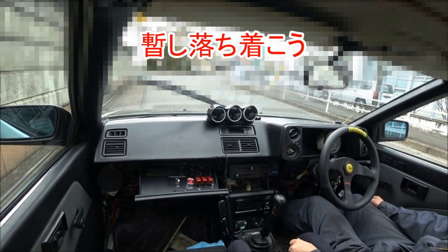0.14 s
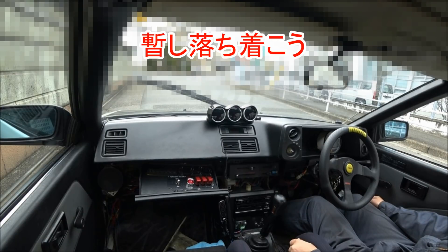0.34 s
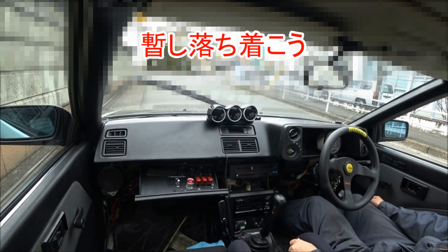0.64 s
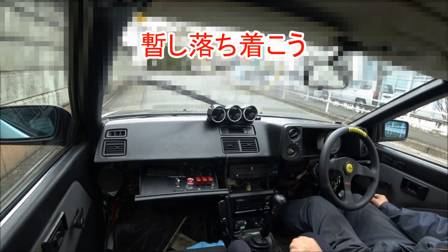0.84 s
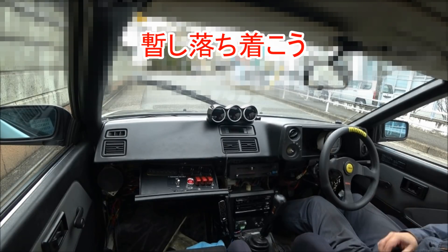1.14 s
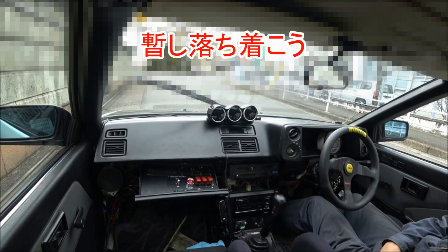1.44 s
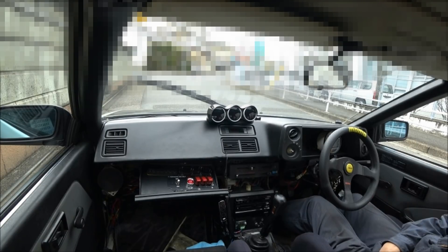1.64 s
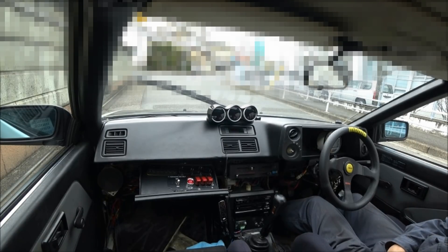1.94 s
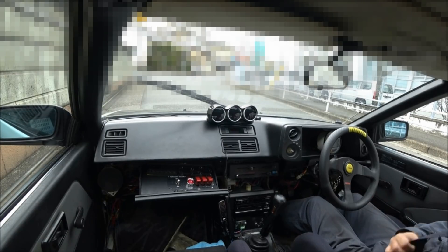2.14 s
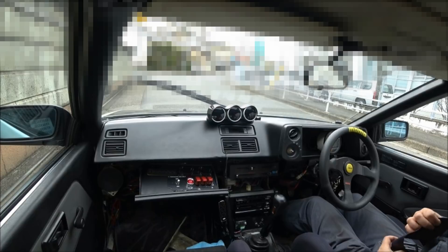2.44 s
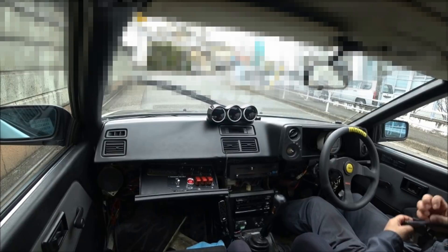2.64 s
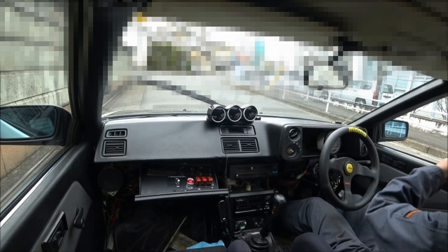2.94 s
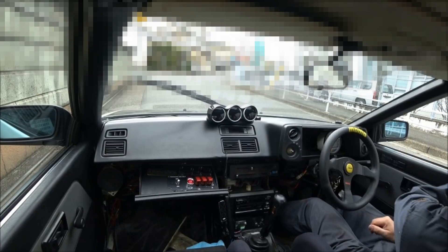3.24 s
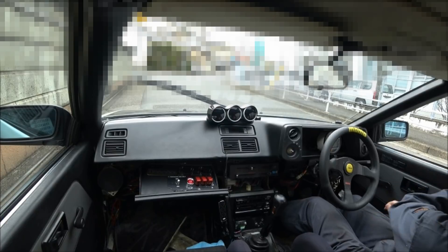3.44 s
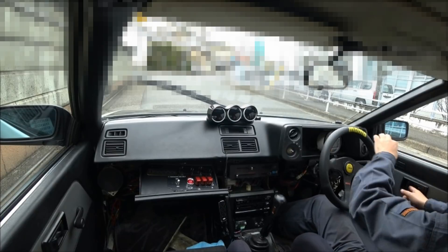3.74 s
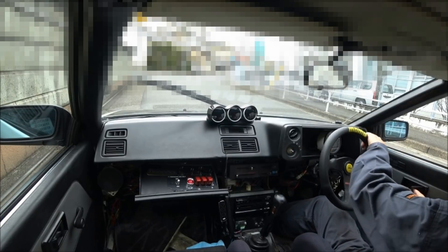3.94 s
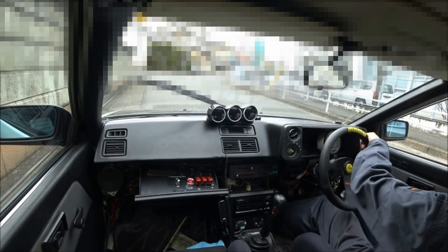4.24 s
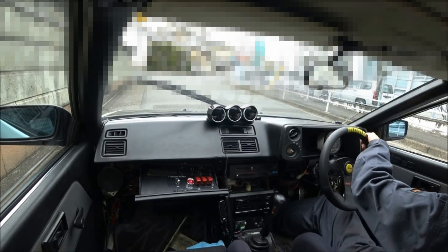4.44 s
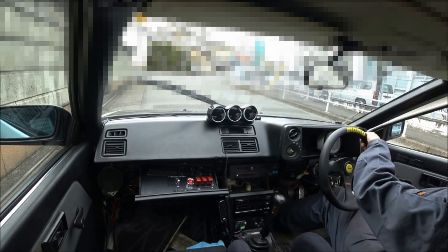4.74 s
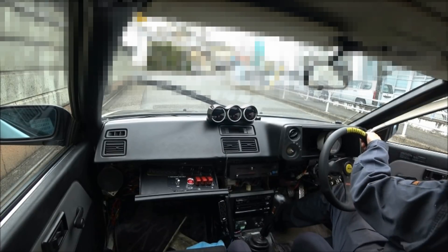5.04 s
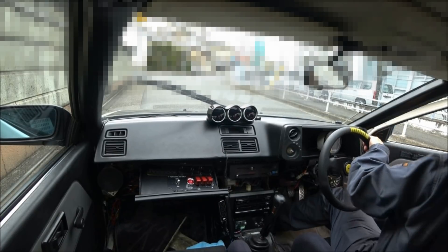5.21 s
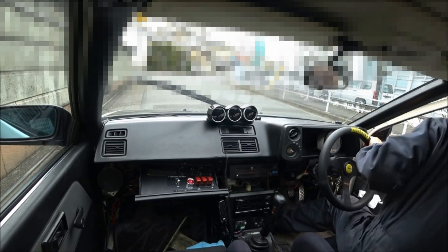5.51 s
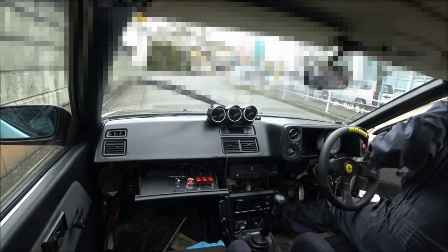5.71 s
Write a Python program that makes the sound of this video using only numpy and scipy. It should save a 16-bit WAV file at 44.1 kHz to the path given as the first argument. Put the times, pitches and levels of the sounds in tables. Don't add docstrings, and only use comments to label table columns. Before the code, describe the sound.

Inside a parked car, a driver unclips the belt, rustles and creaks across the seat, then opens the door with thumps and low rumble.

```python
import sys
import numpy as np
from scipy import signal
from scipy.fft import rfft, irfft, next_fast_len
from scipy.io import wavfile
from scipy.ndimage import uniform_filter1d

SR = 44100
rng = np.random.default_rng(int(sys.argv[2]) if len(sys.argv) > 2 else 0)


def amplitude_ratio(level_db):
    exponent = np.asarray(level_db, float) / 20
    return 10 ** exponent


def transcribe(u):
    v = np.clip(np.atleast_2d(u).T, -1, 1)
    q = np.round(v * 32767).astype(np.int16)
    wavfile.write(sys.argv[1], SR, q)


N = 258867


def evened(x):
    return x / np.sqrt(np.mean(x ** 2) + 1e-20)


def read(points, hz):
    f, value = np.transpose(points)
    return np.interp(np.log(hz + 1), np.log(f + 1), value)


def pair(count):
    return rng.standard_normal((2, count))


# (frequency [Hz], left-right likeness [0-1])
NEAR = [(25, 0.95), (60, 1), (160, 0.98), (500, 0.87), (1500, 0.92), (4000, 0.29), (11000, 0.05)]
# (frequency [Hz], level [dB])
LEAN = [(300, 0), (600, -1.7), (1200, 0.75), (4000, -2), (8000, -0.9)]
LAG_S = 0.00008


def heard(x, same, shape=((1, 0), (20000, 0))):
    count = x.shape[1]
    size = next_fast_len(count)
    hz = np.fft.rfftfreq(size, 1 / SR)
    right, other = rfft(x, size) * amplitude_ratio(read(shape, hz))
    c = np.clip(read(same, hz), 0, 1)
    left = c * right + np.sqrt(1 - c ** 2) * other
    left = left * np.exp(-2j * np.pi * hz * LAG_S) * amplitude_ratio(read(LEAN, hz))
    return irfft(np.array([left, right]), size)[:, :count]


def move(table, count, steep=1):
    rows = np.array(table)[:, :, None]
    t = np.arange(0, N + 64, 64) / SR
    peak_s, rise_s, fall_s = rows[:, 0], rows[:, 1], rows[:, 2]
    away = np.maximum((peak_s - t) / rise_s, (t - peak_s) / fall_s)
    gain = np.linalg.norm(amplitude_ratio(rows[:, count] - 10 * steep * away), axis=0)
    return np.interp(np.arange(N) / SR, t, gain)


def resonate(x, hz, width_hz):
    r = np.exp(-np.pi * width_hz / SR)
    return 2 * signal.lfilter([1 - r], [1, -r * np.exp(2j * np.pi * hz / SR)], x).real


def flicker(per_s, spread_db, t60_s):
    size = amplitude_ratio(spread_db * np.minimum(rng.exponential(1, N), 4))
    slips = (rng.random(N) < per_s / SR) * size
    fall = np.exp(-np.log(1000) / (t60_s * SR))
    return evened(1 + signal.lfilter([1], [1, -fall], slips))


# (frequency [Hz], left-right likeness [0-1])
STILL = [(60, 0.7), (220, 0.98), (810, 0.28), (2980, 0.039), (11000, 0.01)]
# (frequency [Hz], level [dB])
HUSH = [(88, -6.5), (150, -2.5), (293, -15), (563, -21.5), (780, -15.5), (839, -19.5), (3150, -27.5),
        (10400, -30), (11400, -30), (14800, -72), (22000, -120)]


def still_cabin():
    return amplitude_ratio(-46.5) * evened(heard(pair(N), STILL, HUSH))


# (peak [s], rise [s], fall [s], rumble [dB])
BOOM = [(.2, 0.37, 1, -32), (.46, 0.035, 0.97, -28.5), (.9, 0.052, 0.14, -31), (1.4, 0.14, 0.11, -27),
        (1.54, 0.15, 1, -30.5), (2.2, 0.33, 0.6, -34.5), (2.75, 0.16, 0.51, -32), (3.2, 1, 0.36, -28.5),
        (3.53, 0.1, 0.089, -24.5), (3.74, 0.033, 0.29, -22), (4.01, 0.059, 0.18, -21),
        (4.2, 0.026, 0.093, -17.5), (4.36, 0.089, 0.26, -22), (4.62, 0.24, 0.069, -21),
        (4.76, 0.019, 0.082, -25), (4.9, 0.091, 0.19, -25), (5.13, 0.26, 0.14, -24),
        (5.33, 0.0985, 0.052, -18.5), (5.59, 0.22, 0.46, -18), (5.87, 0.28, 0.18, -24)]
# (frequency [Hz], density [dB per Hz])
RUMBLE = [(7.1, -5), (12, -19.5), (32, 2), (60, -3.5), (81, -7.5), (100, -4.5), (114, -16), (200, -68),
          (260, -72), (440, -120)]
# (frequency [Hz], width [Hz], level [dB])
CABIN = [(29.7, 17, -2.5), (63.7, 4.7, -5), (160, 15.6, -4.5), (214.8, 46, 0), (419, 16, -4.5),
         (601, 116, -3), (694, 12, 5), (865, 12, -6)]


def shell():
    air = evened(heard(pair(N), NEAR, RUMBLE))
    boom = air + 2.05 * sum(amplitude_ratio(db) * resonate(air, hz, width) for hz, width, db in CABIN[:2])
    power = (boom ** 2).mean(0)
    swing = np.sqrt(uniform_filter1d(uniform_filter1d(power, 2500), 1200)) + 0.1
    return move(BOOM, count=3) * evened(boom / swing ** 0.65)


# (peak [s], rise [s], fall [s], seat groan [dB], frame creak [dB])
MOVES = [(0, .3, 0.16, -43, -46.5), (.3, 0.15, 0.87, -48, -64), (1.04, 0.29, 1, -39, -67),
         (1.3, 0.91, 0.34, -57, -42), (1.55, 0.31, 0.62, -44.5, -44.5), (2.19, 0.35, 0.096, -37, -41.5),
         (2.73, 0.99, 0.075, -37.5, -44), (2.96, 0.19, 0.18, -31, -36), (3.1, 0.031, 0.15, -24.5, -26.5),
         (3.33, 0.37, 0.27, -34, -37.5), (3.78, 0.043, 0.07, -29.5, -35.5), (4.02, 0.11, 0.83, -28, -34),
         (4.4, 0.078, 0.5, -27, -43), (5.02, 0.31, 0.39, -27, -35.5), (5.45, 0.6, 0.15, -30.5, -37),
         (5.87, 0.11, 0.066, -25.5, -35)]
# (frequency [Hz], density [dB per Hz])
GROAN = [(59, -8), (100, 1), (178, -2), (226, -3.5), (340, -9.5), (440, -40), (750, -120)]
# (frequency [Hz], density [dB per Hz])
CREAK = [(190, -14), (320, 1), (416, -1.5), (506, -5), (850, -22.5), (1100, -11), (1870, -120)]


def seat():
    lumps = flicker(per_s=60, spread_db=0.33, t60_s=0.059)
    slips = move(MOVES, count=3) * evened(heard(pair(N) * lumps, NEAR, GROAN))
    slips += move(MOVES, count=4) * evened(heard(pair(N) * lumps, NEAR, CREAK))
    cabin = sum(amplitude_ratio(db) * resonate(slips, hz, width) for hz, width, db in CABIN[2:])
    return 0.67 * slips + 0.97 * cabin


def patchy(x, patchy_db):
    z = signal.stft(x, nperseg=512)[2]
    field = rng.standard_normal(z.shape[::-1][:2])
    field = uniform_filter1d(uniform_filter1d(field, 12, 0), 5, 1)
    return signal.istft(z * amplitude_ratio(patchy_db * evened(field).T), nperseg=512)[1][:, :N]


# (peak [s], rise [s], fall [s], nylon sizzle [dB], cloth rub
# [dB])
STROKES = [(1.083, 0.2, 0.052, -34, -40.5), (1.18, 0.0093, 0.048, -46, -42),
           (1.271, 0.014, 0.36, -42, -43), (1.39, 0.16, 0.15, -40.5, -41), (1.52, 0.02, 0.046, -36.5, -38),
           (1.6, 0.035, 0.77, -51.5, -64), (1.7, 0.048, 0.019, -46, -41.5),
           (1.781, 0.0072, 0.0072, -53, -66), (1.93, 0.13, 0.12, -43.5, -42),
           (2.05, 0.083, 0.39, -40.5, -39), (2.194, 0.061, 0.12, -34, -35),
           (2.45, 0.072, 0.24, -42.5, -58), (2.65, 0.26, 0.058, -39, -39), (2.732, 0.043, 0.12, -33, -76),
           (2.86, 0.03, 0.94, -43, -40.5), (3.05, 0.25, 0.077, -56, -62),
           (3.179, 0.095, 0.026, -34.5, -35), (3.3, 0.12, 0.13, -43, -47), (3.47, 0.12, 0.077, -47, -45),
           (3.75, 0.52, 0.18, -50.5, -48.5), (3.93, 0.012, 0.11, -48.5, -56),
         (3.972, 0.013, 0.022, -44, -27.5), (4.255, 0.015, .015, -47, -51),
         (4.064, 0.0089, 0.019, -62, -31.5), (4.105, 0.016, 0.022, -59, -40),
         (4.16, 0.031, 0.018, -59, -42), (4.21, 0.011, 0.077, -53, -39.5), (4.396, 0.07, 0.049, -37.5, -49),
         (4.528, 0.056, 0.0088, -44.5, -39), (4.7, 0.32, 0.082, -47, -48.5),
         (4.92, 0.19, 0.037, -41.5, -36.5), (5.07, 0.23, 0.11, -39, -34.5), (5.28, 0.094, 0.055, -44, -40),
         (5.454, 0.31, 0.14, -40.5, -37.5), (5.81, 0.13, 0.11, -37.5, -38.5)]
# (frequency [Hz], density [dB per Hz])
RUB = [(460, -35), (780, -4), (1590, -2.5), (1720, -6), (2070, -4.5), (3200, -9.5), (4160, -18.5),
       (7040, -120)]
# (frequency [Hz], density [dB per Hz])
SIZZLE = [(1470, -5), (2500, -0.5), (4450, 1), (4810, -0.5), (6120, 1.5), (9980, 1), (11000, -1.5),
          (11400, -57), (14800, -52), (22000, -120)]


def jacket():
    stir_s, stir_rise_s = 0.828, 0.063
    drag = flicker(per_s=70, spread_db=0.27, t60_s=0.012)
    strokes = STROKES
    rub = evened(patchy(heard(pair(N) * drag, NEAR, RUB), patchy_db=1.5))
    sizzle = evened(patchy(heard(pair(N) * drag ** 0.54, NEAR, SIZZLE), patchy_db=2.0))
    rub = amplitude_ratio(-3.0) * move(strokes, count=4, steep=0.86) * rub
    sizzle = amplitude_ratio(2.0) * move(strokes, count=3) * sizzle
    moving = np.clip((np.arange(N) / SR - stir_s) / stir_rise_s, 0, 1)
    return moving * (rub + sizzle)


FADE = np.cos(np.linspace(0, np.pi / 2, 6144)) ** 0.5


def played(table, strike):
    out = np.zeros((2, N))
    for s, *row in table:
        sound = strike(*row)
        part = out[:, round(s * SR):][:, :sound.shape[1]]
        part += sound[:, :part.shape[1]]
    return out


def burst(t60_s, rise_s, contact):
    t = np.arange(len(FADE)) / SR
    rise_s = max(rise_s, 0.0002)
    shape = amplitude_ratio(-60 * t / max(t60_s, 0.006)) * (1 - np.exp(-t / rise_s))
    noise = pair(len(t)) * shape / shape.max()
    noise[:, round(rise_s * SR)] += contact
    return noise


def click(db, hz, t60_s, width_hz, rise_s):
    bright = [(250, -21), (700, 4.0), (4000, 16.0), (11000, 14.5)]
    snap = heard(burst(t60_s, rise_s, contact=2.3), NEAR, bright)
    tone = resonate(resonate(snap, hz, width_hz), hz, width_hz) * FADE
    return amplitude_ratio(db) * tone / abs(tone).max()


# (time [s], peak [dB], t60 [s])
CLACKS = [(0.869, -39.5, 0.065), (1.141, -35, 0.15), (1.18, -40, .04), (1.518, -28.5, 0.098),
          (1.9289, -21.5, 0.051), (2.846, -30, 0.058), (3.1776, -20.5, 0.02), (3.719, -31.5, 0.046),
          (3.973, -23.5, 0.087), (4.178, -36, 0.078), (4.214, -38, 0.055), (4.256, -35, 0.07),
          (4.4021, -27, 0.089), (5.059, -21, 0.081)]


def clacks():
    return played(CLACKS, lambda db, t60_s: click(db, 1100, t60_s, width_hz=750, rise_s=0.00026))


def knock(db, hz, t60_s):
    soft = [(hz / 4, -24), (hz / 4.8, -1.5), (hz * 1.51, -1.5), (hz * 2.94, -30), (hz * 6, -70)]
    rise_s = 0.74 / hz
    blow = heard(burst(t60_s, rise_s, contact=15.4), NEAR, soft)
    part = resonate(blow, hz, 0.12 * hz)
    cabin = sum(amplitude_ratio(d) * resonate(blow, f, width) for f, width, d in CABIN[2:])
    onset = np.minimum(np.arange(1, len(FADE) + 1) * hz / SR, 1)
    both = (evened(part) + 0.5 * evened(cabin) + 0.5 * evened(blow)) * FADE * onset
    return amplitude_ratio(db) * both / abs(both).max()


# (time [s], peak [dB], ring [Hz], t60 [s])
KNOCKS = [(0.87, -22, 160, 0.59), (0.888, -17.5, 86.5, 0.087), (1.388, -19.5, 96.5, 0.034),
          (1.515, -25, 157, 0.068), (2.23, -23, 157, 0.2),  (2.672, -15.5, 165.4, 0.063),
          (3.076, -17.5, 166, 0.08), (3.136, -14.5, 85.2, 0.15), (3.189, -17, 219, 0.087),
          (3.426, -16.5, 153, 0.17), (3.496, -19.5, 112, 0.19), (3.718, -20, 160, 0.11),
          (3.973, -15.5, 198, 0.064), (4.056, -11.5, 122, 0.034), (4.182, -38, 103, 0.078),
           (4.252, -15.5, 209, 0.035), (4.331, -29, 220, 0.29), (4.416, -22, 107, 0.079),
          (4.509, -20, 176, 0.058), (4.525, -20, 191, 0.04), (4.611, -25, 221, 0.077),
           (4.901, -37, 85, 0.052), (4.916, -16, 211, 0.077), (5.038, -13.5, 108, 0.16),
          (5.1, -19, 91, 0.048), (5.164, -30, 209, 0.05), (5.286, -17.5, 107, 0.088),
          (5.581, -18.5, 88, 0.022), (5.801, -16, 160, 0.23), (5.849, -16, 102, 0.018)]


def knocks():
    return played(KNOCKS, knock)


def ping(db, hz, t60_s):
    t = np.maximum(np.arange(len(FADE)) / SR - np.array([[LAG_S], [0]]), 0)
    rise_s = 0.29 / hz + 0.00023
    shape = amplitude_ratio(-60 * t / max(t60_s, 0.006)) * (1 - np.exp(-t / rise_s)) * FADE
    return amplitude_ratio(db) * shape / shape.max() * np.sin(2 * np.pi * hz * t)


# (time [s], peak [dB], mode [Hz], t60 [s])
PINGS = [(.871, -43, 2600, 0.015), (1.178, -30, 8060, 0.022), (1.9285, -26, 1050, 0.024),
         (1.929, -18.5, 4830, .03), (1.929, -31, 2200, 0.09), (1.929, -29, 6500, .02),
         (1.943, -28, 1060, 0.021), (1.946, -21, 9470, 0.021), (1.952, -21, 3130, 0.04),
         (1.951, -21, 3500, .035), (1.9515, -26, 6550, .03), (3.812, -26.5, 10630, 0.013),
         (4.215, -38, 5200, .02), (4.405, -20.5, 8130, 0.012), (1.178, -43, 3020, .015),
         (4.919, -25, 8100, .05), (2.821, -40, 1140, 0.053), (2.845, -24, 1200, 0.025),
         (2.85, -30, 1570, 0.035), (2.848, -33, 2400, 0.015), (2.905, -34, 950, 0.035),
         (3.139, -32, 1390, 0.11), (3.161, -29, 1485, 0.092), (3.17, -22, 879, 0.12),
         (3.173, -20, 627, 0.16), (3.184, -18, 713, .04), (3.718, -32.5, 627, .04),
         (3.796, -37, 3300, 0.015), (3.812, -19, 2740, 0.027), (3.8118, -25.5, 2250, .015),
         (3.812, -29.5, 738, 0.032), (3.811, -28, 3630, 0.035), (3.812, -26, 6282, 0.022),
         (3.968, -25, 1058, 0.12), (3.972, -17, 580, 0.05), (3.978, -24.5, 458, 0.23),
         (4.18, -34.5, 700, 0.027), (4.255, -22.5, 432, 0.047), (4.257, -30, 1030, 0.047),
         (4.405, -20.5, 1250, 0.034), (4.403, -29.5, 837, 0.049), (4.403, -28.5, 2725, 0.055),
         (4.42, -28.5, 604, .08), (5.291, -15.5, 1320, 0.012), (5.2914, -20, 1720, 0.011),
         (5.293, -24, 860, 0.022), (5.813, -40, 2200, 0.027)]


def pings():
    return played(PINGS, ping)


# (time [s], peak [dB], mode [Hz], t60 [s])
THUDS = [(.872, -20, 170, 0.027), (.892, -18.5, 79.6, 0.087), (2.66, -26.5, 303, 0.24),
         (2.914, -21.5, 302, 0.058), (3.105, -30, 642, 0.36), (3.125, -26, 399, 0.35),
         (3.19, -19.5, 233, 0.098), (3.21, -35, 805, 0.29), (3.428, -18, 419, 0.21),
         (3.432, -23.5, 705, 0.11), (3.436, -34, 860, 0.049), (3.445, -28, 308, 0.086),
         (3.995, -23, 227, 0.13), (4.056, -15, 69.6, 0.05), (4.211, -11, 62, 0.049),
         (4.512, -20, 194, 0.024), (4.524, -9, 196, 0.044), (4.659, -31, 264, 0.13),
         (4.958, -26, 108, 0.32), (5.164, -25, 223, 0.06), (5.578, -15.5, 100, 0.11),
         (5.51, -29, 342, 0.051), (1.522, -17, 110, 0.045), (1.567, -32, 310, 0.063),
         (1.628, -34, 430, 0.033), (1.637, -24, 192, 0.066), (1.678, -38, 420, 0.042),
         (2.847, -24.5, 333, .05), (5.805, -22, 149, 0.055), (5.702, -36, 278, 0.063),
         (5.835, -22, 243, 0.087)]


def thuds():
    return played(THUDS, ping)


# (time [s], peak [dB], mode [Hz], t60 [s])
MORE_PINGS = [(1.14, -38.5, 1490, 0.041), (1.194, -41, 2200, .015), (1.179, -35, 1160, .025),
              (1.179, -44, 9900, 0.018), (1.777, -43, 3040, .02), (1.381, -31, 2380, 0.026),
              (1.776, -47, 8000, 0.011), (1.93, -28, 10550, 0.014), (1.955, -23, 8100, .02),
              (1.96, -29, 4900, .04), (1.929, -26, 8600, .025), (2.037, -30.5, 400, .04), (2.044, -26, 150, .06),
              (2.345, -28, 285, 0.077), (2.379, -30, 575, .04), (2.75, -34, 570, 0.16), (3.562, -43, 600, .04),
              (4.216, -41, 1300, 0.012), (4.262, -23, 590, 0.022), (4.525, -32, 900, 0.048),
              (4.525, -38, 1530, 0.022), (4.755, -42, 1220, 0.039), (4.797, -35.5, 950, 0.043),
              (4.8, -34.5, 1340, 0.033), (4.9, -36, 1540, 0.046), (5.03, -33, 1340, .05), (5.035, -32, 954, .05),
              (5.06, -23, 1253, 0.026), (5.062, -29, 2420, .03), (5.11, -30.5, 558, 0.062),
              (5.17, -37.5, 1346, 0.09), (5.225, -35.5, 1270, .06), (5.248, -38, 2300, .02),
              (5.579, -34.5, 1010, 0.036), (2.854, -31, 1810, .03), (2.855, -32, 1250, 0.037),
              (5.814, -40, 4330, 0.018), (5.814, -35, 2960, .02)]


def more_pings():
    return played(MORE_PINGS, ping)


# (time [s], peak [dB], centre [Hz], t60 [s])
CLICKS = [(1.1777, -31, 8800, 0.027), (1.3797, -17.5, 2420, 0.034), (1.5252, -16.5, 9300, 0.063),
          (1.7753, -26.5, 6300, 0.036), (1.928, -18, 4960, 0.035), (1.9418, -12, 8700, 0.069),
          (1.951, -15, 3170, 0.15), (2.67, -22.5, 2780, 0.061), (2.7386, -20.5, 3350, 0.11),
          (2.8439, -23, 2300, 0.038), (3.8105, -20, 4470, 0.091), (3.963, -21, 2050, 0.096),
          (3.9745, -22.5, 2420, 0.063), (4.2155, -31, 2430, 0.022), (4.2517, -27, 2980, 0.076),
          (4.4034, -17, 2690, 0.045), (4.5184, -27.5, 3300, 0.062), (5.2473, -24.5, 2550, 0.029),
          (5.8138, -18.5, 2110, 0.021), (5.83, -25, 10300, 0.21)]


def clicks():
    return played(CLICKS, lambda db, hz, t60_s: click(db, hz, t60_s, width_hz=9700, rise_s=0.0033))


# (time [s], peak [dB], ring [Hz], t60 [s])
RAPS = [(1.52, -18.5, 266, 0.077), (2.347, -32, 277, 0.02), (2.375, -30, 420, 0.12),
        (2.65, -15.5, 427, 0.17), (2.679, -26.5, 313, 0.28), (2.912, -22.5, 280, 0.046),
        (3.157, -13.5, 405, 0.36), (3.174, -14, 614, 0.083), (3.188, -23, 234, 0.1), (3.218, -39, 260, 0.1),
        (3.431, -15.5, 268, 0.15), (3.432, -19, 434, 0.16), (3.451, -17.5, 299, 0.34),
        (3.945, -22, 296, 0.22), (3.974, -23, 1000, 0.085), (3.978, -14, 404, 0.15),
        (4.028, -22, 246, 0.13), (4.257, -27, 350, 0.038), (4.419, -25.5, 364, 0.051),
        (5.098, -18.5, 243, 0.1), (5.287, -17, 302, 0.044), (5.581, -18.5, 239, 0.055)]


def raps():
    return played(RAPS, knock)


# (time [s], peak [dB], centre [Hz], t60 [s], width
# [Hz])
RINGS = [(1.9455, -14, 9700, 0.018, 1800), (1.961, -11.5, 7670, 0.044, 1510),
         (1.954, -24.5, 2620, 0.06, 300), (2.651, -26, 615, 0.034, 244), (3.142, -30, 1400, 0.05, 250),
         (3.164, -23, 1450, 0.058, 298), (3.177, -24, 684, 0.094, 160), (3.413, -28, 3200, 0.044, 900),
         (3.434, -27, 590, 0.1, 147), (3.464, -31, 3300, 0.05, 900), (3.511, -31, 3220, .028, 800),
         (3.8115, -20, 4770, 0.03, 1500), (3.8127, -15, 6350, 0.0072, 7050), (3.982, -27, 547, 0.074, 198),
         (4.899, -32, 8080, 0.4, 120), (5.291, -20, 1380, 0.021, 900), (2.035, -33, 2250, 1, 350)]


def rings():
    return played(RINGS, lambda db, hz, t60_s, width_hz: click(db, hz, t60_s, width_hz, 0.54 / width_hz))


# (start [s], length [s], depth [dB])
DIVE = [
    (4.048, 0.013, -16),
    (4.058, 0.14, -21.5),
    (4.06, 0.032, -15),
    (4.121, 0.019, -8),
    (4.221, 0.026, -22),
    (4.272, .016, -20),
    (4.28, 0.043, -7.5),
]


def gain_dive_db():
    t = np.arange(N) / SR
    dive_db = 0
    for s, length_s, db in DIVE:
        phase = np.clip((t - s) / length_s, 0, 1)
        dive_db = dive_db + db * abs(np.sin(np.pi * phase)) ** 0.54
    return dive_db


def scene():
    dive_db = gain_dive_db()
    blows = clacks() + knocks() + pings() + thuds() + more_pings() + clicks() + raps() + rings()
    mix = amplitude_ratio(dive_db) * still_cabin() + shell()
    mix += amplitude_ratio(0.57 * dive_db) * (seat() + jacket())
    return mix + amplitude_ratio(0.43 * dive_db) * blows


def roll_off(x):
    return signal.sosfilt(signal.butter(12, 11550, fs=SR, output="sos"), x)


def record(dry):
    left_db, edge_hz = 1.2, 11030
    x = dry * amplitude_ratio(np.array([[left_db], [-left_db]]) / 2)
    x = 0.85 * np.tanh(x / 0.87)
    lowpass = signal.firwin(2047, edge_hz, window=("kaiser", 8), fs=SR)
    x = signal.oaconvolve(x, lowpass[None], "same")
    return roll_off(x)


dry = scene()
out = record(dry)
transcribe(out)
```